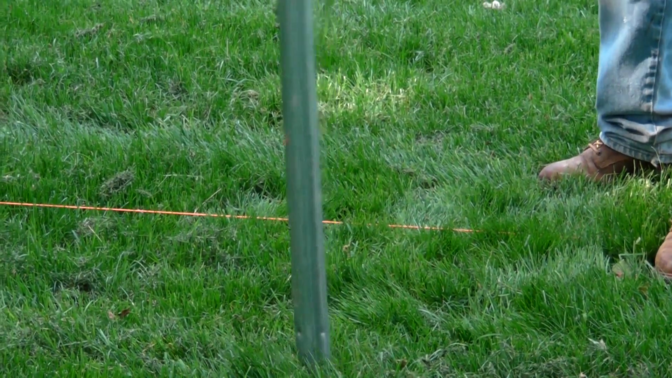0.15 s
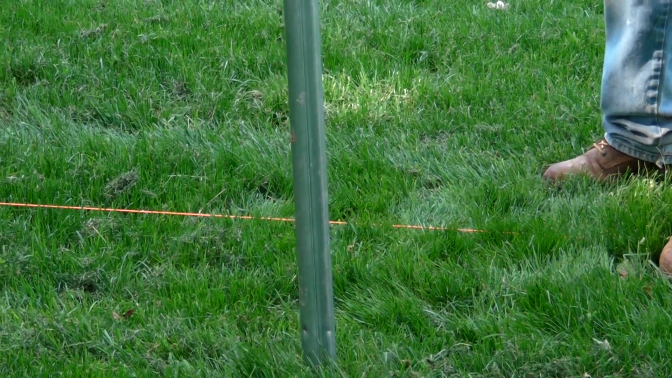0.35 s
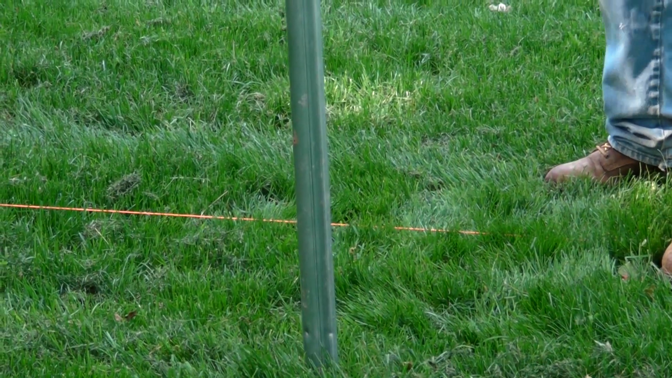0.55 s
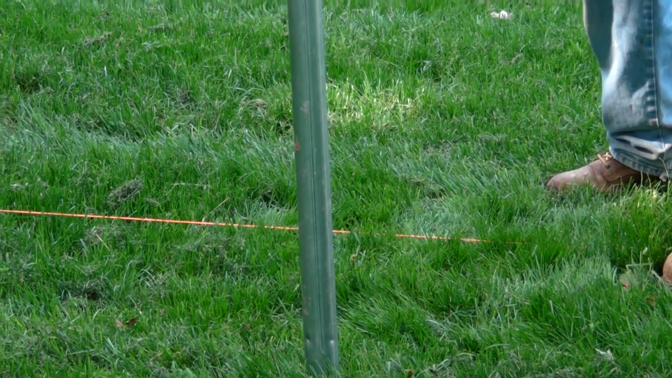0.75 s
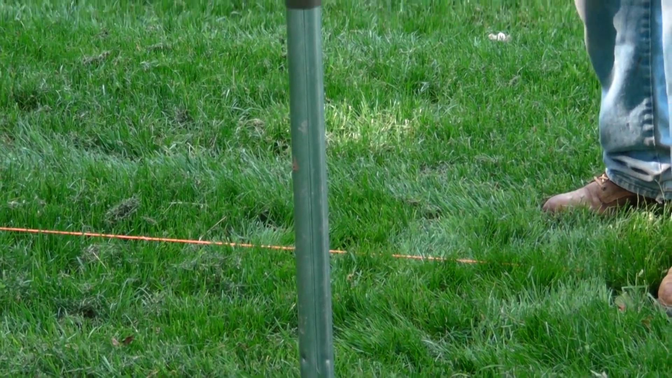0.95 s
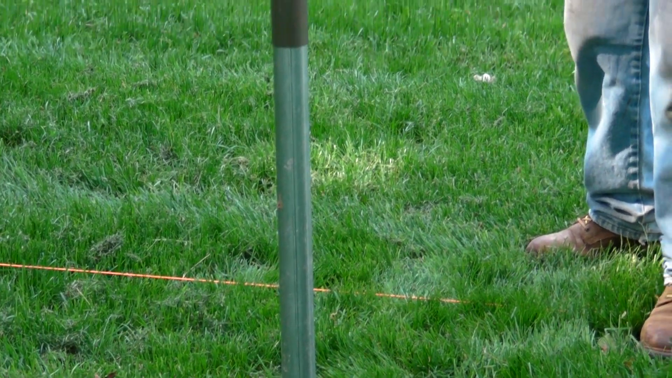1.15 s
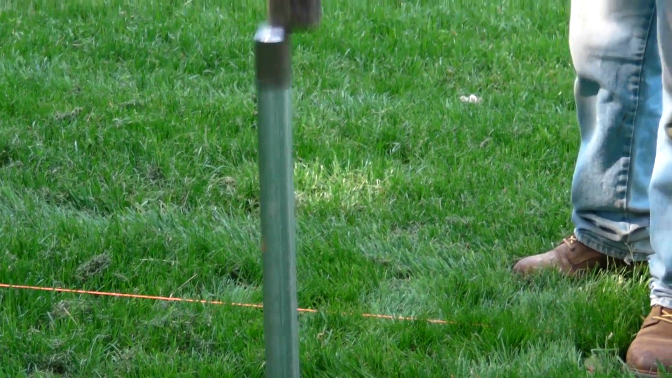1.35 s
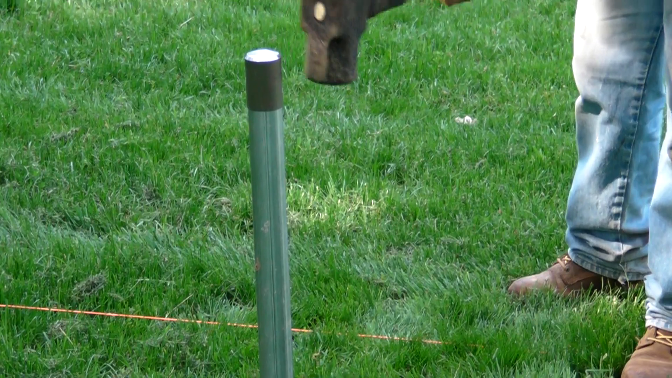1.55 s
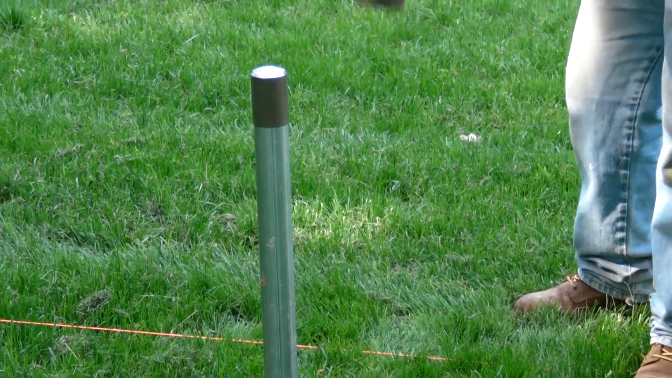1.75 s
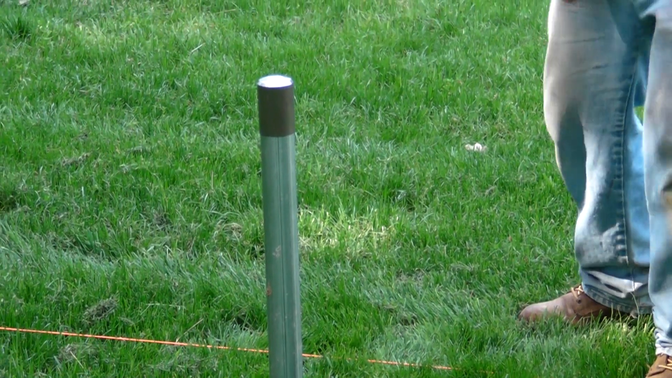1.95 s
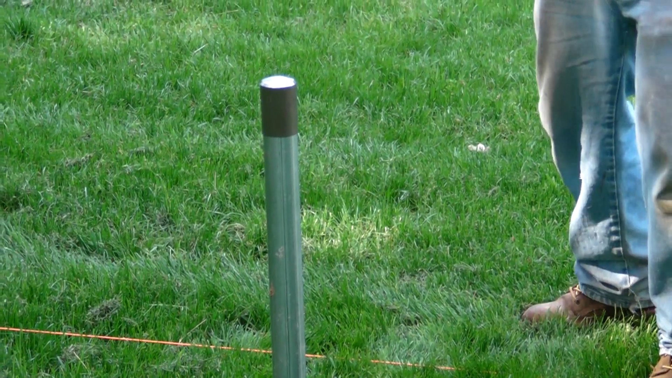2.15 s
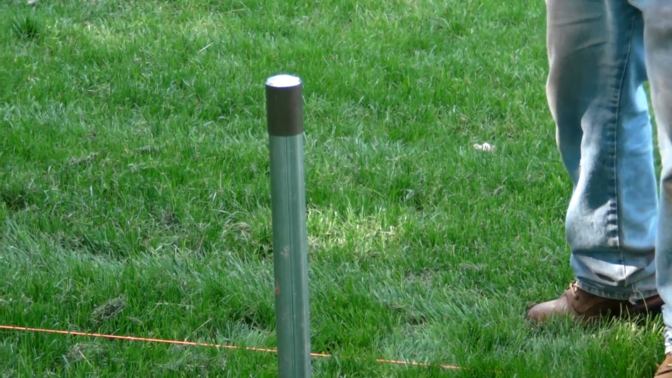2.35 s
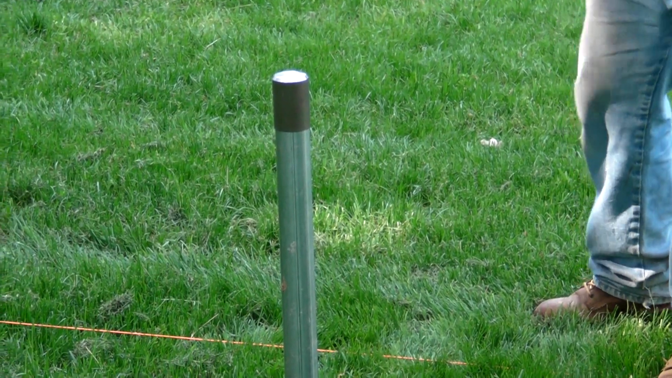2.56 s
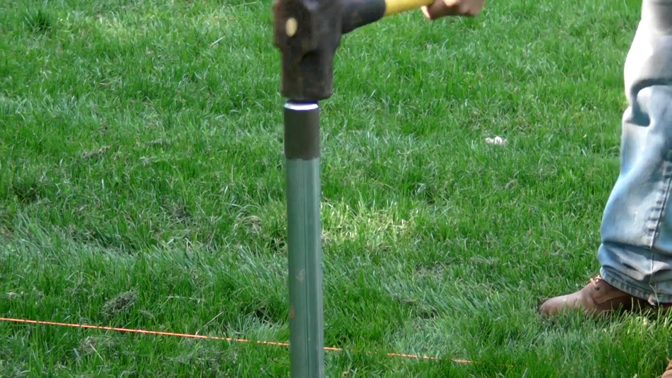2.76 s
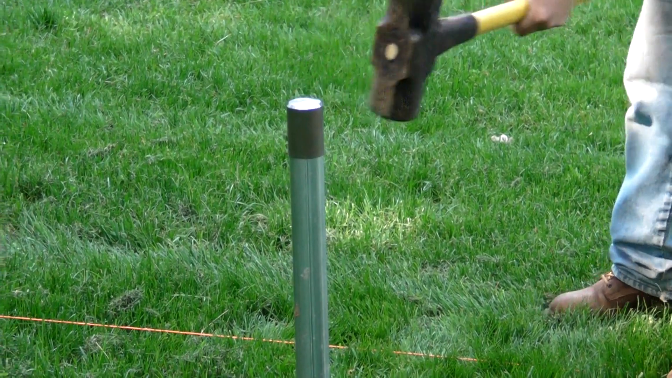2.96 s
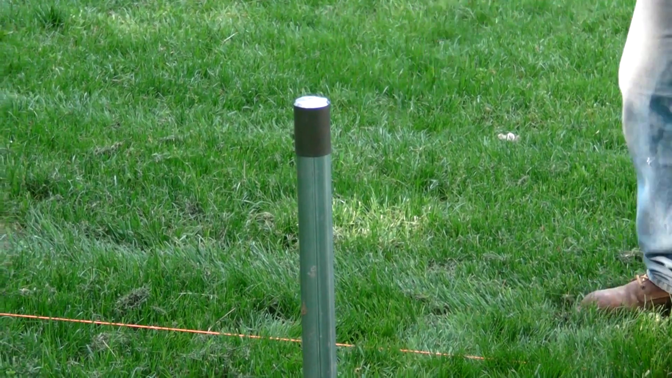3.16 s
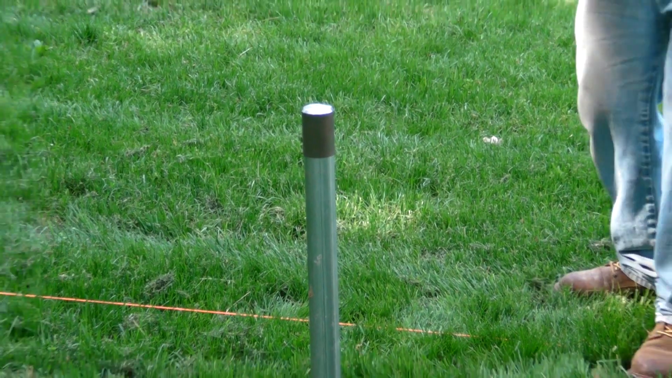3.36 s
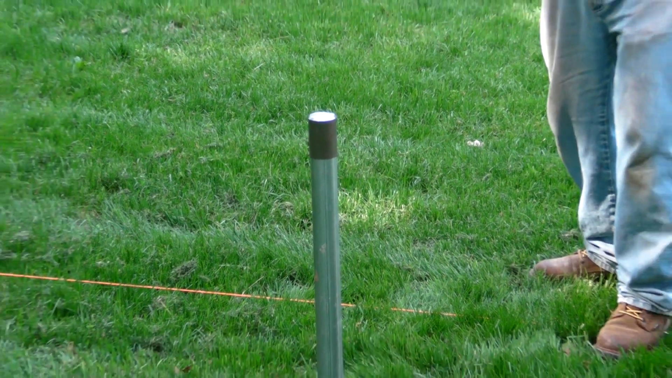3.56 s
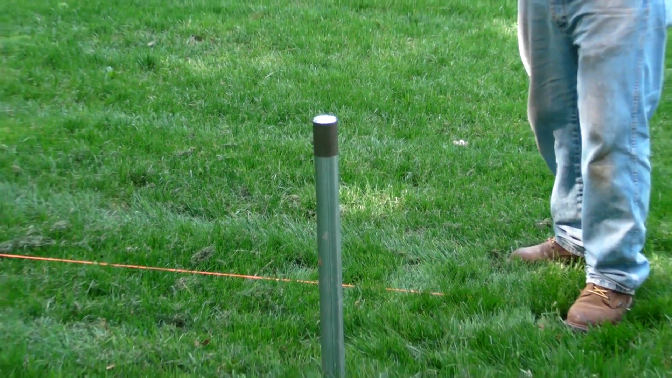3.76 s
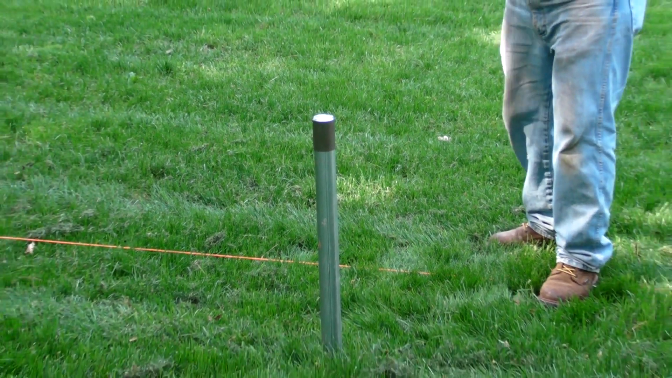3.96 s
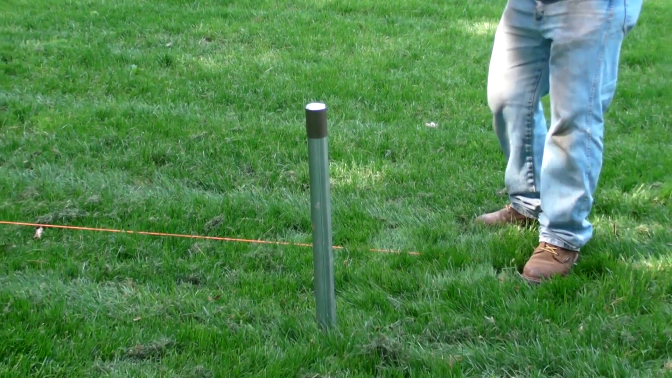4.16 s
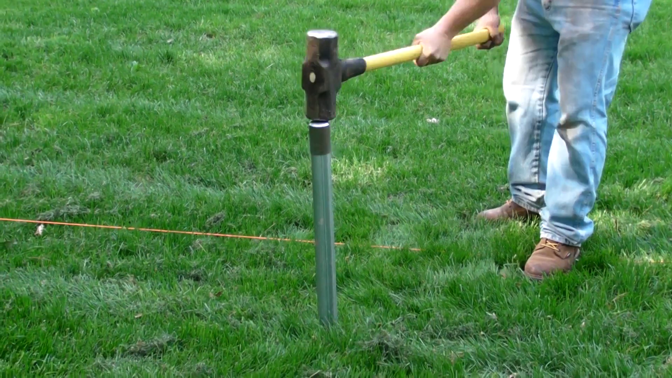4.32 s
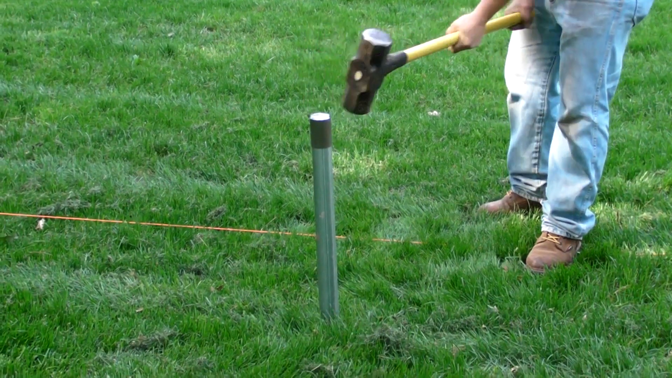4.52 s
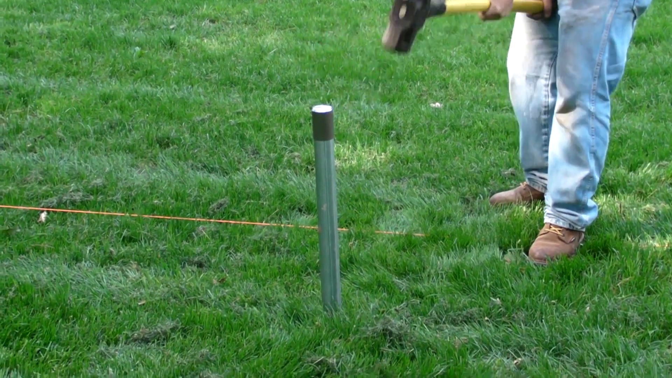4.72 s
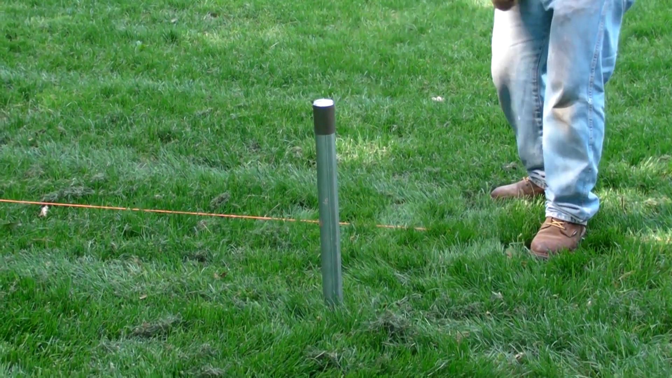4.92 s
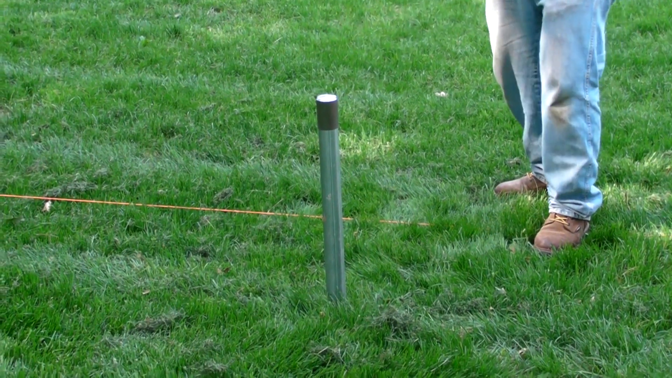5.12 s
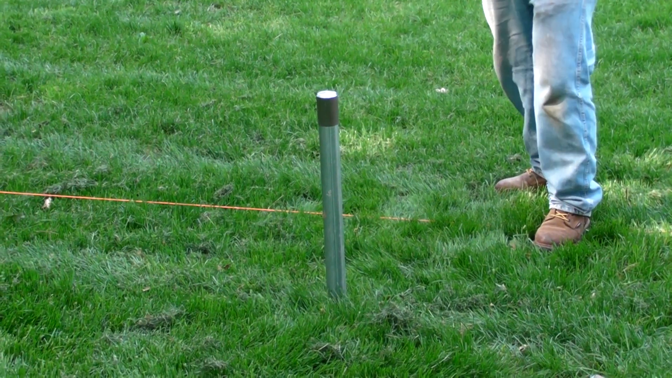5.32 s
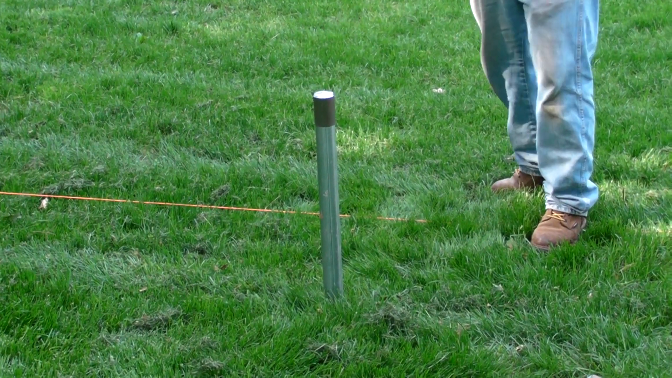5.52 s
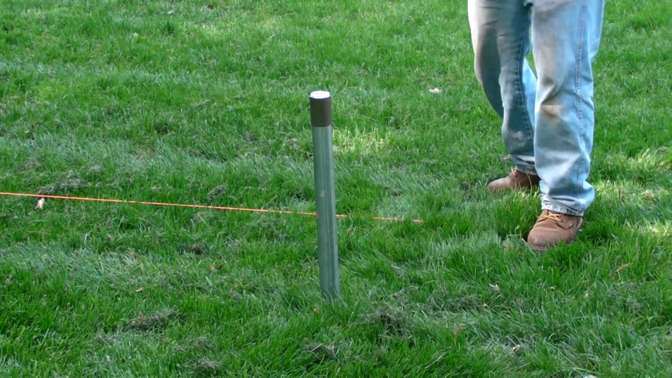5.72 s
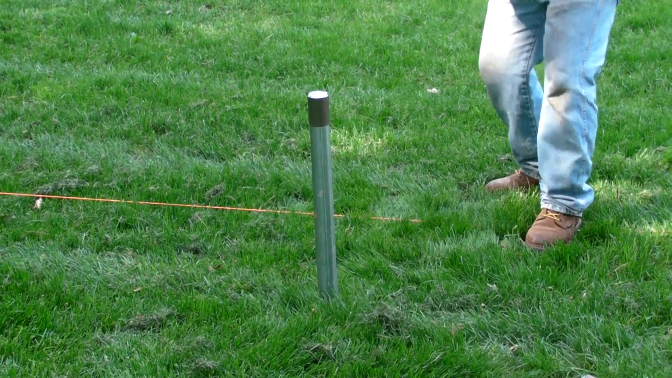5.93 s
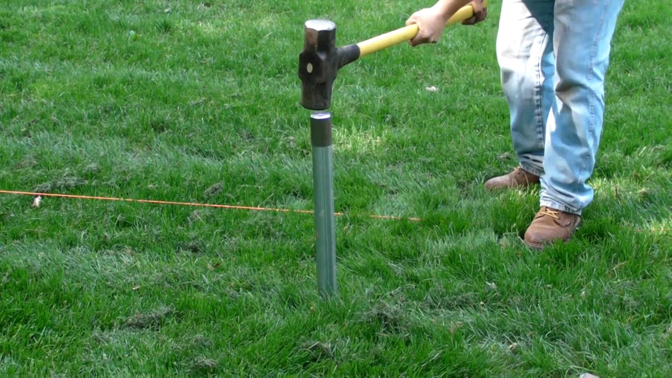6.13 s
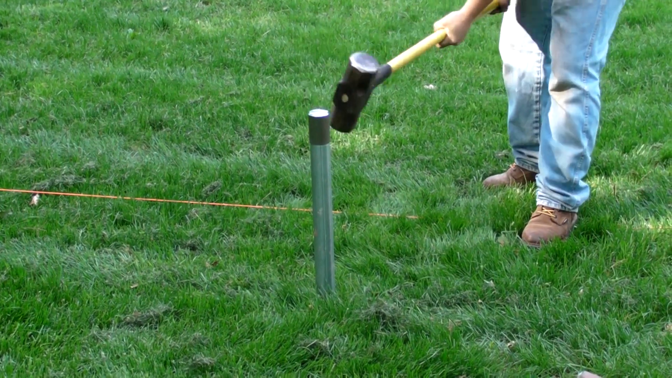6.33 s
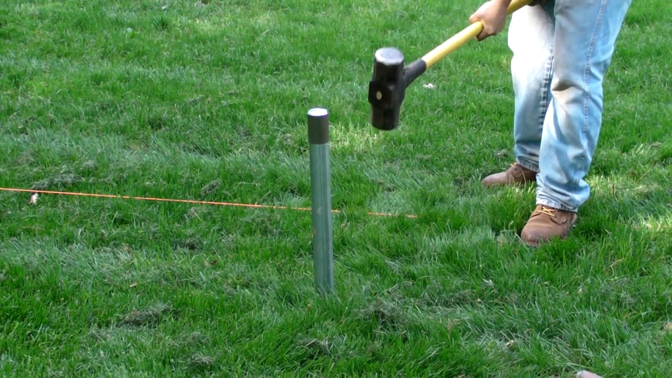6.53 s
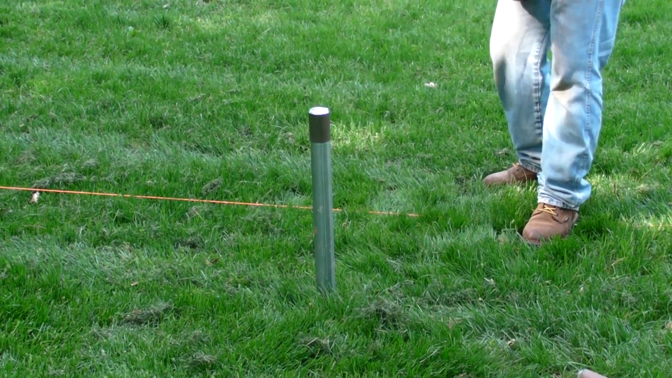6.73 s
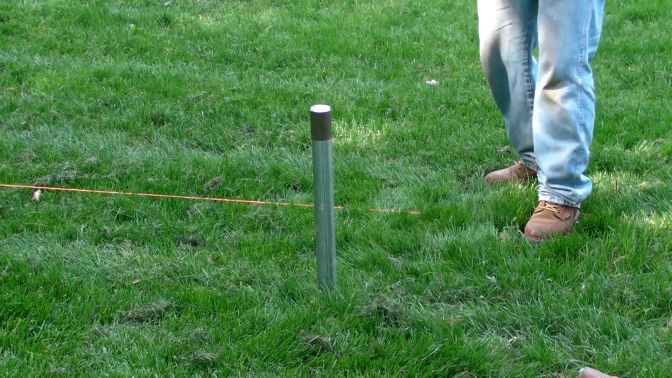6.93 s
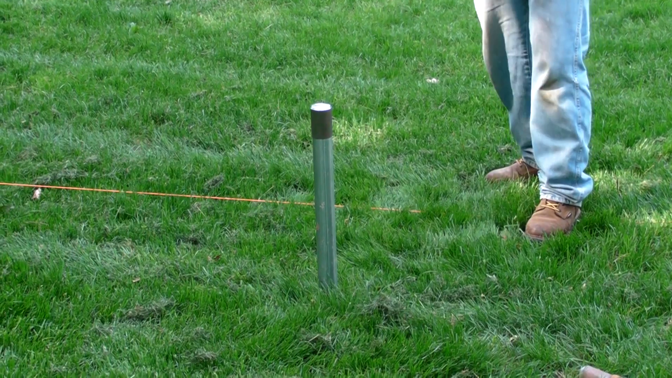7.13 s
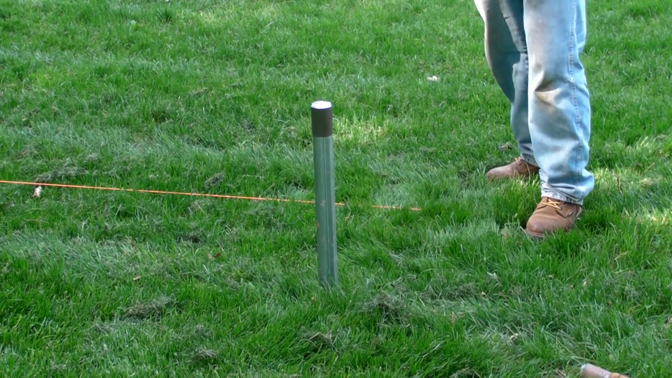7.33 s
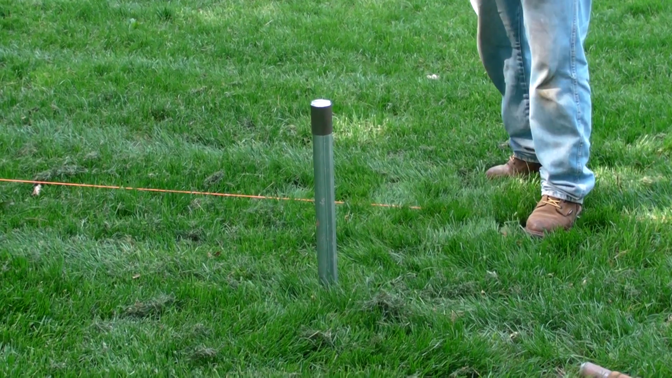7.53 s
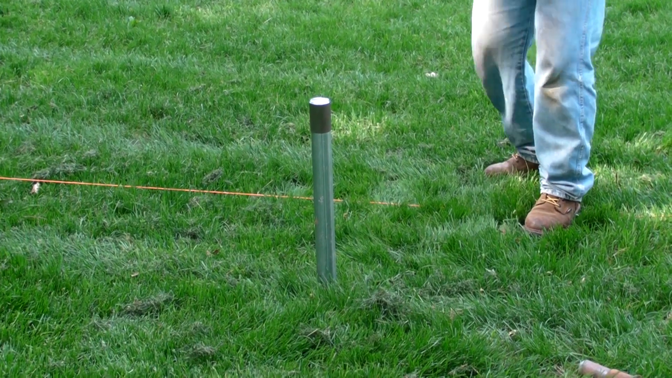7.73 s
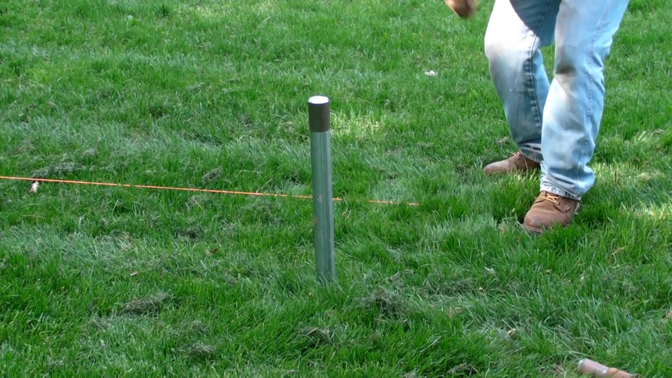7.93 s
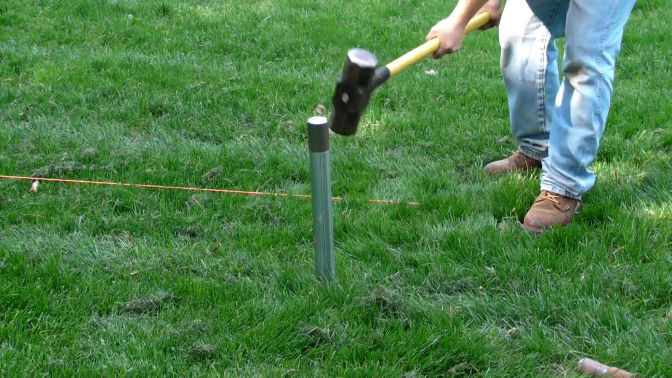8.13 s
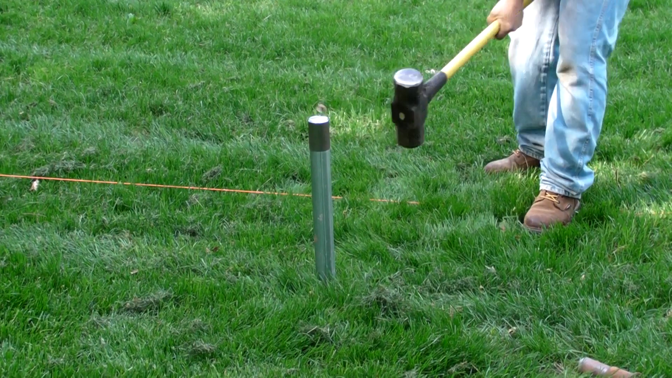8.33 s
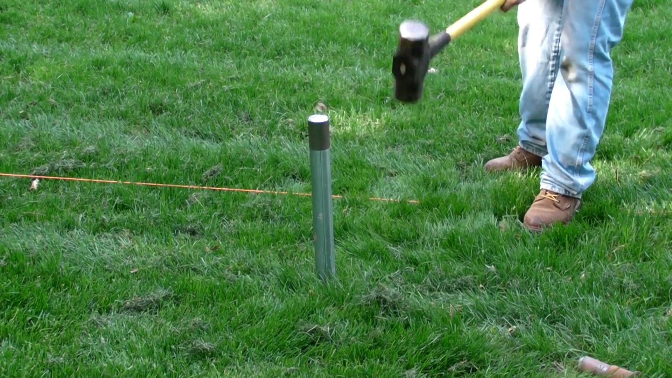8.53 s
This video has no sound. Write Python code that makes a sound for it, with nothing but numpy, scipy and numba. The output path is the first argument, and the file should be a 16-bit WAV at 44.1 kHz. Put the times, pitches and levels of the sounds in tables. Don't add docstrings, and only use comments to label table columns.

```python
import sys
import numpy as np
from scipy import signal
from scipy.fft import rfft, irfft, next_fast_len
from scipy.io import wavfile
from scipy.ndimage import uniform_filter1d
from numba import njit

SR = 44100
rng = np.random.default_rng(int(sys.argv[2]) if len(sys.argv) > 2 else 0)


def store_wav(level_fs):
    pcm = np.round(np.clip(np.atleast_2d(level_fs), -1, 1) * 32767)
    wavfile.write(sys.argv[1], SR, pcm.T.astype(np.int16))


def natural_amplitude(level_db):
    exponent = np.asarray(level_db, float) / 20
    return 10 ** exponent


N = 382787


def unit(x):
    return x / np.sqrt(np.mean(x ** 2))


def band(count, hz, width):
    f = np.arange(count // 2 + 1) * SR / count + 1e-3
    resonance = 1 / (1 + ((f - hz ** 2 / f) / width) ** 2)
    return unit(irfft(rfft(rng.standard_normal(count)) * resonance, count))


def fade(t, t60):
    return natural_amplitude(-60 * t / t60)


def tone(hz, width, t):
    return np.exp(-np.pi * width * t) * np.sin(2 * np.pi * hz * t)


def walk(rate, count):
    k = int(SR / rate)
    steps = np.repeat(rng.standard_normal(count // k + 1), k)
    return unit(uniform_filter1d(steps, k)[:count])


def add(out, x, s):
    i = int(s * SR)
    out[..., i:i + x.shape[-1]] += x[..., :N - i]


def crack(blow_db, bright_db, glance_db, t):
    # pitch in Hz, width in
    # Hz, time to die away in seconds
    post_parts = [(2570, 730, 0.024), (3363, 970, 0.028),
                  (1370, 1520, 0.041), (6170, 3600, 0.046), (11620, 3700, 0.049)]
    # level above the lower body in dB,
    # share of brightness (dB per dB), share of glance (dB per dB)
    part_mix = [(1.15, 0.14, 0.088), (-7., 0.63, -0.2), (-3, 0.6, -0.069), (-8, 0.35, 0.13)]
    part_db = [0] + list(np.array(part_mix) @ [1, bright_db, glance_db])
    near, spread = np.zeros((2, len(t))), np.zeros(len(t))
    for (hz, width, t60), db in zip(post_parts, part_db):
        mid = band(len(t), hz, width)
        side = natural_amplitude(-11.5) * band(len(t), hz, width)
        rattle = natural_amplitude(blow_db + db) * fade(t, t60) * np.array([mid, side])
        snap = tone(hz, width, t)
        near += rattle
        near[0] += natural_amplitude(blow_db + db + 2) * snap
        spread += unit(snap) * np.sqrt(np.mean(rattle ** 2) * 2)
    return near, spread


def thud(blow_db, glance_db, thud_db, t):
    hz = 135 * 2 ** (0.18 * glance_db)
    turf = natural_amplitude(-9) * np.sin(2 * np.pi * 356 * t)
    return natural_amplitude(blow_db + thud_db) * fade(t, 0.039) * (np.sin(2 * np.pi * hz * t) + turf)


def ringing(blow_db, bright_db, glance_db, thud_db, t):
    mode_hz = [1891, 5294, 7357, 10067, 11343, 12623]
    mode_t60 = [.6, 1.1, .5, .4, .42, .34]
    mode_hold = [1.3, 1.3, 2.2, 1.2, 1.2, 1.2]
    # beat in Hz, strength of the partner tone 0-1, share sent to the yard in dB
    mode_pair = [(6., .4, 4.), (29., .9, 5.), (9., .15, -16.), (45., .9, 8.), (12., .3, -8.),
                 (5., .2, -12.)]
    # level in dB, then its shares of brightness, glance and drive (dB per dB)
    mode_mix = [(-44., .3, -.2, .05), (-45.5, .45, -.5, .05), (-41., .05, 1.1, .05), (-49., .95, -.2, .05),
                (-43., .7, .55, .05), (-54., .05, .1, -.9)]
    mode_db = np.array(mode_mix) @ [1, bright_db, glance_db, thud_db]
    near, spread = np.zeros(len(t)), np.zeros(len(t))
    for hz, t60, hold, (beat_hz, share, yard_db), db in zip(mode_hz, mode_t60, mode_hold, mode_pair, mode_db):
        phase, partner_phase = 2 * np.pi * rng.random(2)
        partner_hz = hz + beat_hz * (1 + 0.8 * rng.random())
        pair = np.sin(2 * np.pi * hz * t + phase)
        pair += share * np.sin(2 * np.pi * partner_hz * t + partner_phase)
        wobble_db = 3.5 * walk(45, len(t))
        ring = natural_amplitude(blow_db + db + wobble_db) * fade((t / t60) ** hold, 1) * pair
        near += ring
        spread += natural_amplitude(yard_db) * ring
    return near, spread


def post(blow_db, t):
    # pitch in Hz, width in Hz, level in dB
    tube_tones = [(2524, 33, -28), (3340, 68, -31.5), (1345, 140, -26)]
    return sum(natural_amplitude(blow_db + db) * unit(tone(hz, width, t)) for hz, width, db in tube_tones)


def blows():
    # start in seconds, strength in dB, brightness in dB,
    # glance that rings the head in dB, drive into the soil in dB
    strikes = [
        (.157, 8, -3, -7.5, -23),
        (1.388, 12.5, -5.5, -1.5, -18.),
        (2.762, 12.5, 3, 0.5, 0.5),
        (4.2974, 11.5, 5.5, -2.5, 0.5),
        (6.056, 10, 9, 5.5, -7.5),
        (8.015, 11.5, 0, 9, -6.5),
    ]
    near, soil, spread = np.zeros((2, N)), np.zeros(N), np.zeros(N)
    t = np.arange(32768) / SR
    short = t[:4096]
    for s, blow_db, bright_db, glance_db, thud_db in strikes:
        crack_near, crack_spread = crack(blow_db, bright_db, glance_db, short)
        ring_near, ring_spread = ringing(blow_db, bright_db, glance_db, thud_db, t)
        add(near, crack_near, s)
        add(near[0], ring_near, s)
        add(soil, thud(blow_db, glance_db, thud_db, short), s)
        add(spread, crack_spread + post(blow_db, short), s)
        add(spread, ring_spread, s)
    return near, soil, spread


def yard():
    # pitch in Hz, level in dB, time to die away in seconds, left-right likeness 0-1
    echo_bands = [(450, -14, 0.78, 0.9), (880, -17, 0.92, 0.97), (1673, -5.5, 1.46, 0.84),
                  (2530, -3.5, 1.45, 0.72), (4620, 5, 1.18, 0.12), (6000, 12, 0.82, 0), (10600, 19, 0.5, 0)]
    count = 65536
    t, out = np.arange(count) / SR, np.zeros((2, count))
    for hz, db, t60, like in echo_bands:
        like = np.clip(like, 0, 1)
        mid = np.sqrt(1 + like) * band(count, hz, 0.74 * hz)
        side = np.sqrt(1 - like) * band(count, hz, 0.59 * hz)
        clumps_db = 1.5 * walk(69.84, count)
        out += natural_amplitude(db + clumps_db) * fade(t, t60) * np.array([mid + side, mid - side])
    behind_s, woods_end_s = 0.45, 0.8
    swell_db = np.interp(t, [0.029, 0.18, behind_s], [-22, -8, -12])
    swell_db += 10.5 * np.clip(t - behind_s, 0, woods_end_s - behind_s)
    started = t > 0.02
    return out * started * natural_amplitude(-21 + swell_db) / np.sqrt(SR / 10)


def walls(blow):
    wall_delay = [.125, .184, .245, .251]
    wall_level = [-34., -32., -30., -34.]
    dull = signal.sosfilt(signal.butter(2, 4500, fs=SR, output="sos"), blow)
    out = np.zeros_like(blow)
    for delay, db in zip(wall_delay, wall_level):
        add(out, natural_amplitude(db) * dull, delay)
    return out


def small():
    # start in seconds, level in dB, pitch in Hz, width in Hz, time to die away in seconds
    taps = [
        (4.376, -5, 1800, 2900, 0.025),
        (6.134, -9, 2000, 2600, 0.04),
        (.283, -21, 820, 490, 0.059),
        (8.258, -27, 750, 420, 0.036),
        (1.005, -31.5, 190, 170, 0.049),
        (2.8, -44, 11000, 6200, .014),
        (3.249, -54, 11000, 14000, 0.0096),
    ]
    # middle in seconds, half length in seconds, pitch in Hz, width in Hz, level in dB
    puffs = [
        (3.486, 0.076, 8060, 9000, -48),
        (3.814, 0.049, 7200, 1000, -50),
        (4.003, .07, 3880, 700, -58),
        (7.868, 0.087, 3440, 64, -56),
        (4.16, 0.031, 3000, 3970, -51.5),
        (5.827, 0.095, 8000, 8000, -60),
        (7.132, .04, 1920, 60, -52),
    ]
    out, t = np.zeros(N), np.arange(4096) / SR
    for s, db, hz, width, t60 in taps:
        rise = np.minimum(t / 0.0015, 1)
        add(out, natural_amplitude(db) * fade(t, t60) * rise * band(4096, hz, width), s)
    for s, length, hz, width, db in puffs:
        count = int(length * SR) * 2
        add(out, natural_amplitude(db) * np.hanning(count) ** 1.1 * band(count, hz, width), s - length)
    return out


def air():
    # pitch in Hz, level in dB per Hz
    air_colour = np.array([(30, -14), (100, -8.5), (370, -11.5), (483, -19), (1000, -19.5), (3000, -35),
                           (5000, -36.5), (15900, -50.5)])
    # pitch in Hz, side minus mid in dB
    air_width = np.array([(30, -33.5), (125, -17.5), (300, -9), (2000, -7.5), (6000, 2.5), (14000, -1)])
    # pitch in Hz, width in Hz, level in dB
    machine = [(108, 60, -41), (123.2, 20, -49), (351.2, 9.8, -49.5)]
    size = next_fast_len(N)
    logf = np.log(np.arange(size // 2 + 1) * SR / size + 1)
    colour = natural_amplitude(np.interp(logf, np.log(air_colour[:, 0]), air_colour[:, 1]))
    wide = natural_amplitude(np.interp(logf, np.log(air_width[:, 0]), air_width[:, 1]))
    noise = rfft(rng.standard_normal((2, size))) * colour * np.array([np.ones_like(wide), wide])
    out, edges = np.zeros((2, N)), np.log(20 * 2 ** np.arange(0, 10.6, 0.5))
    for lo, hi in zip(edges, edges[1:]):
        part = irfft(noise * ((logf >= lo) & (logf < hi)), size)[:, :N]
        flicker_db = 1.4 - 0.8 * (lo - edges[0]) / (edges[-1] - edges[0])
        out += part * natural_amplitude(flicker_db * walk(6, N))
    out = unit(out) * natural_amplitude(-42.5 + 0.5 * walk(1.285, N))
    for hz, width, db in machine:
        mid = band(size, hz, width)[:N]
        side = 0.24 * band(size, hz, width)[:N]
        out += natural_amplitude(db + 1.1 * walk(7.8, N)) * np.array([mid, side])
    hiss = np.array([band(size, 15000, 3180)[:N] for _ in range(2)])
    out += natural_amplitude(-68) * hiss
    return np.array([out[0] + out[1], out[0] - out[1]])


def scene():
    (mid, side), soil, spread = blows()
    near = np.array([mid + side, mid - side])
    echo = signal.fftconvolve(spread[None], yard(), axes=1)[:, :N] + walls(near)
    dull = signal.sosfiltfilt(signal.butter(6, 11500, fs=SR, output="sos"), echo)
    echo = dull + natural_amplitude(-15) * (echo - dull)
    return (near + soil + echo + small() + air()) * natural_amplitude(np.array([[-0.2], [0.2]]))


@njit
def follow(x, attack, release):
    e, y = 1e-4, np.empty(len(x))
    for i in range(len(x)):
        e += (x[i] - e) * (attack if x[i] > e else release)
        y[i] = e
    return y


def smear(x):
    half = int(0.035 * SR)
    peaks = uniform_filter1d(np.abs(x).max(axis=0), 200)
    loud = np.clip(peaks / natural_amplitude(-7.5), 0, 1) ** 3
    blur = rng.standard_normal((3, 2 * half + 1)) * np.hanning(2 * half + 1)
    blur = (blur[0] + 0.51 * blur[1:]) / np.sqrt(half)
    treble = signal.sosfilt(signal.butter(2, 600, "high", fs=SR, output="sos"), x * loud)
    haze = signal.fftconvolve(treble, blur, mode="same", axes=1)
    return x + natural_amplitude(-10.5) * np.roll(haze, -int(0.0046 * SR), axis=1)


def seams(x):
    # pitch in Hz, width in Hz, depth 0-1
    dips = [(8000, 250, .65), (12050, 900, .75)]
    for hz, width, depth in dips:
        notched = signal.filtfilt(*signal.iirnotch(hz, hz / width, fs=SR), x)
        x = x + depth * (notched - x)
    return x


def low_pass(x):
    return signal.sosfilt(signal.butter(12, 16030, fs=SR, output="sos"), x)


def record(dry):
    attack_s, release_s, ceiling_db, ratio = 0.0035, 0.021, -16.5, 2.42
    level = follow(np.abs(dry).max(axis=0), 1 / (attack_s * SR), 1 / (release_s * SR))
    gain = np.minimum(natural_amplitude(ceiling_db) / level, 1) ** (1 - 1 / ratio)
    flattened = np.clip(dry * gain, -0.88, 0.88)
    bass_cut = signal.sosfilt(signal.butter(2, 50, "high", fs=SR, output="sos"), flattened)
    treble_limit = signal.ellip(8, 0.2, 40, 15850, fs=SR, output="sos")
    mix = signal.sosfiltfilt(treble_limit, seams(smear(bass_cut)))
    return low_pass(mix)


dry = scene()
out = record(dry)
store_wav(out)
```